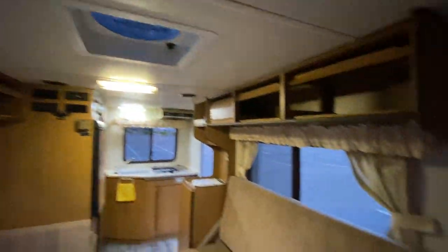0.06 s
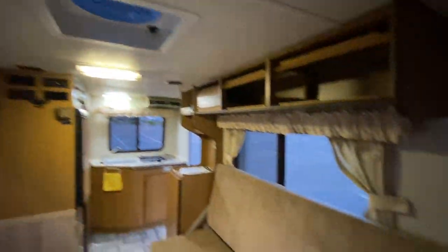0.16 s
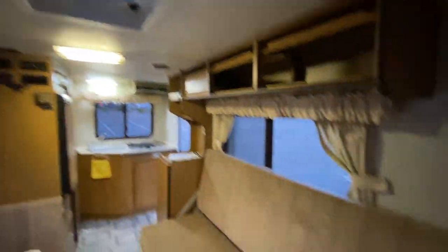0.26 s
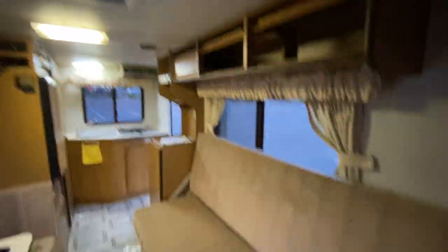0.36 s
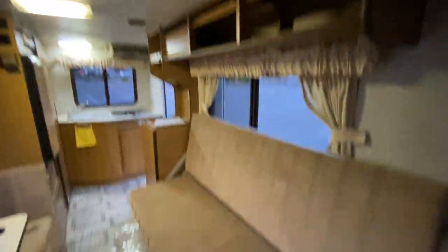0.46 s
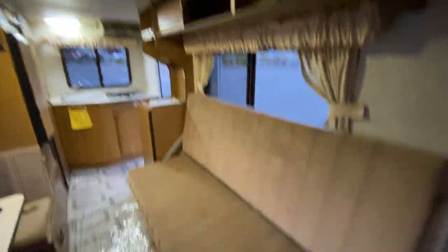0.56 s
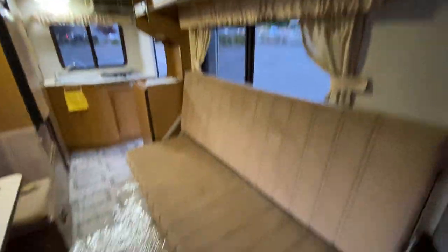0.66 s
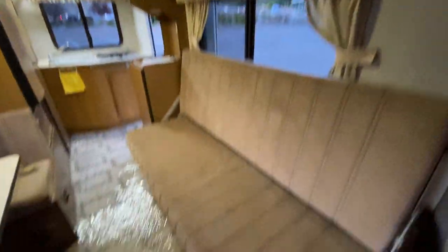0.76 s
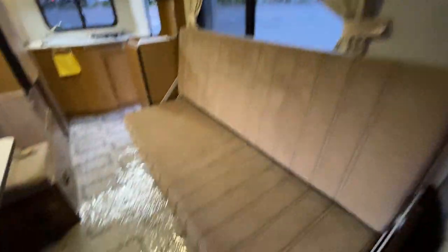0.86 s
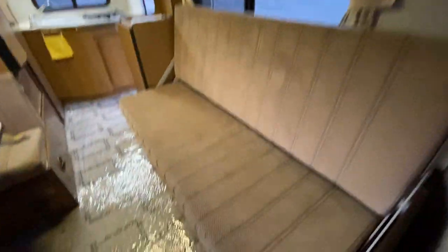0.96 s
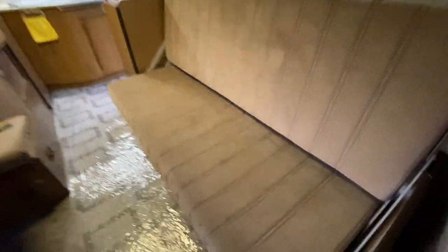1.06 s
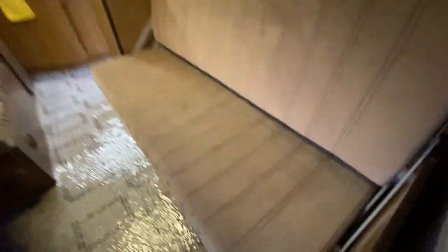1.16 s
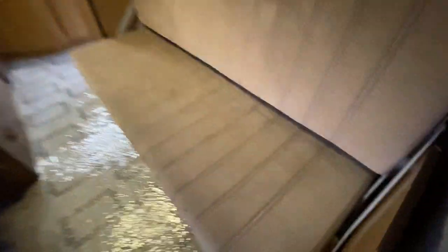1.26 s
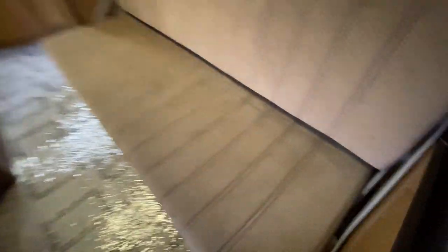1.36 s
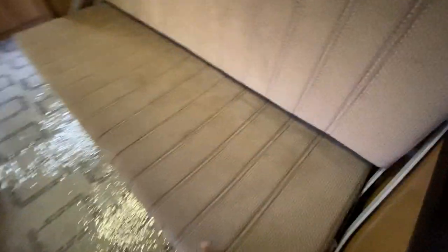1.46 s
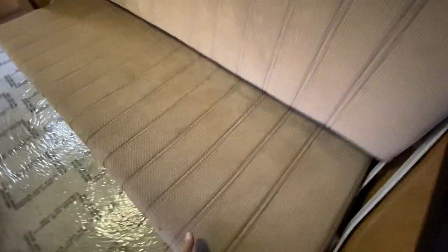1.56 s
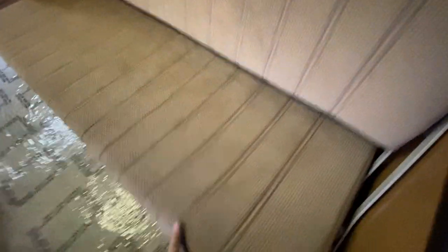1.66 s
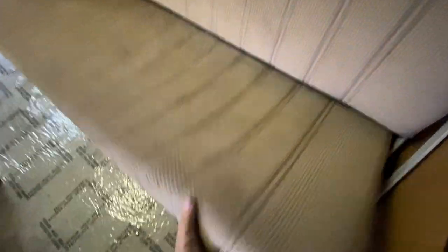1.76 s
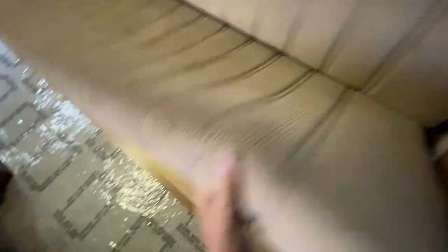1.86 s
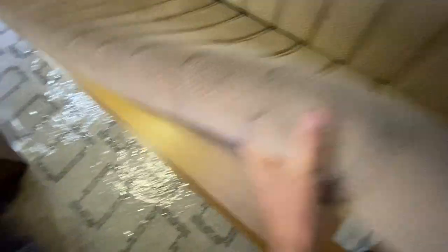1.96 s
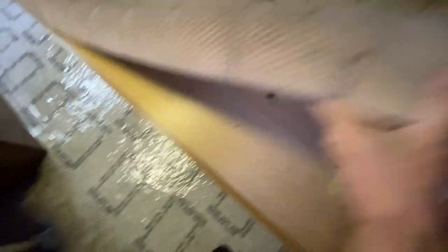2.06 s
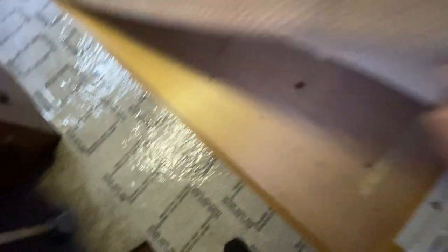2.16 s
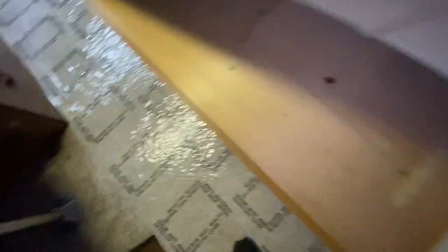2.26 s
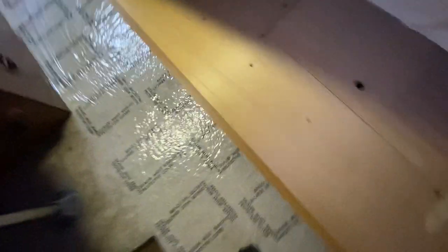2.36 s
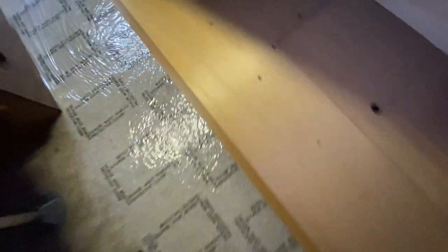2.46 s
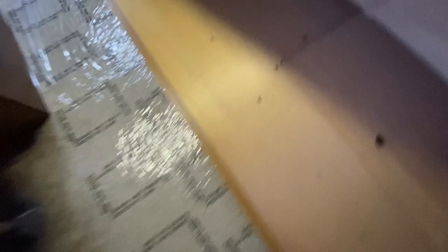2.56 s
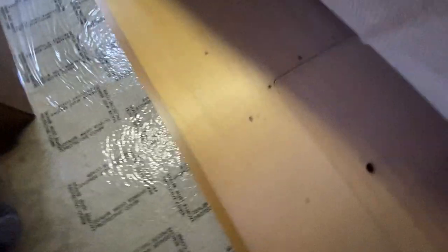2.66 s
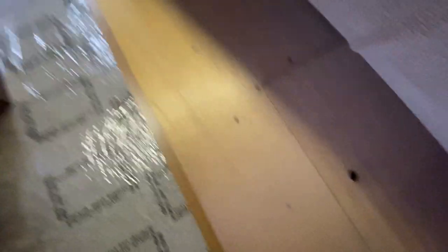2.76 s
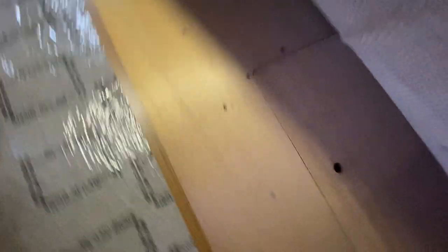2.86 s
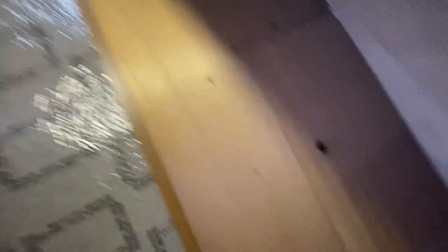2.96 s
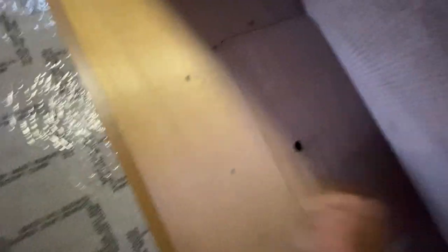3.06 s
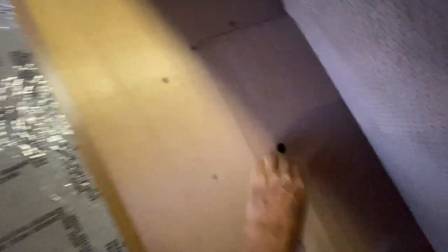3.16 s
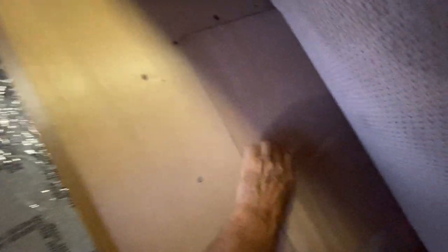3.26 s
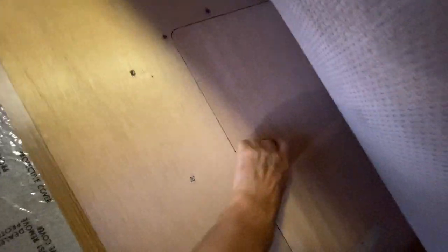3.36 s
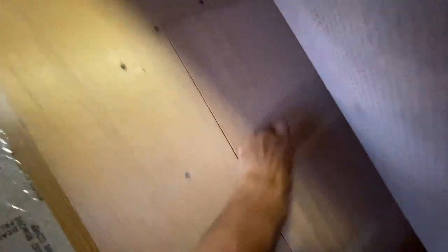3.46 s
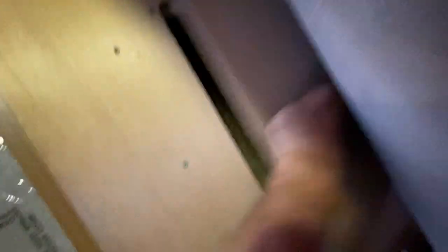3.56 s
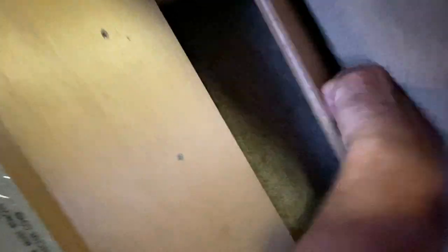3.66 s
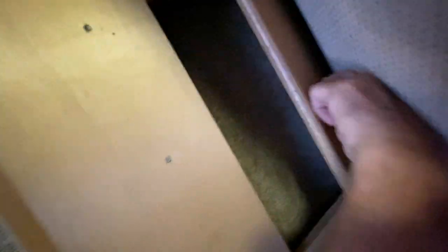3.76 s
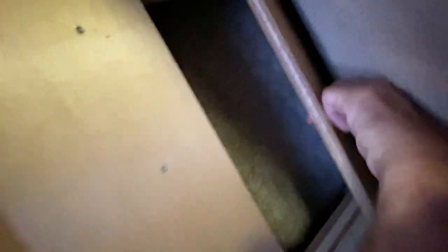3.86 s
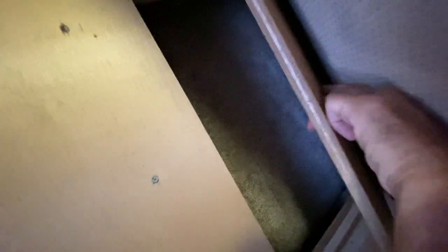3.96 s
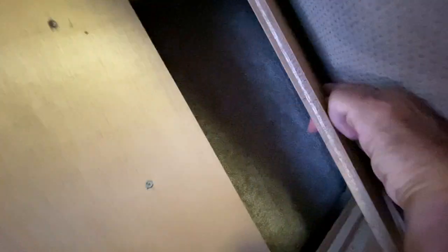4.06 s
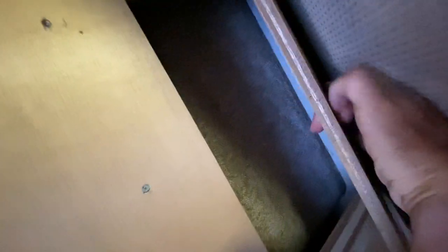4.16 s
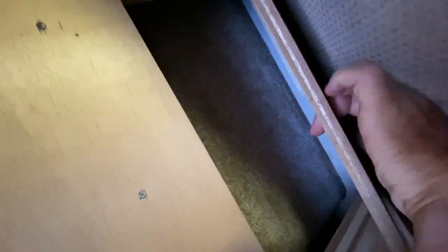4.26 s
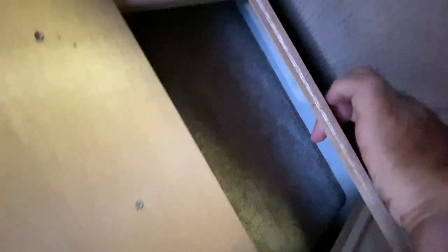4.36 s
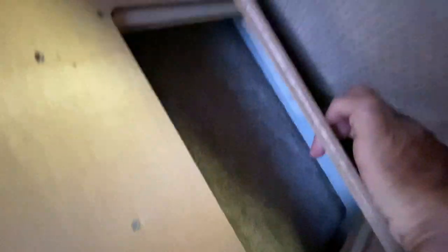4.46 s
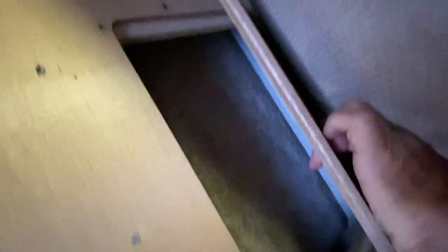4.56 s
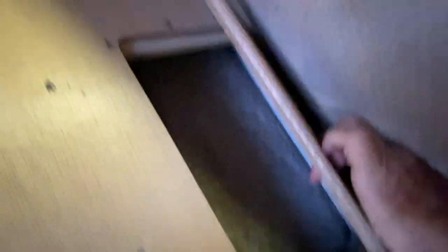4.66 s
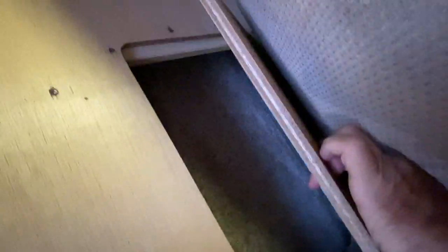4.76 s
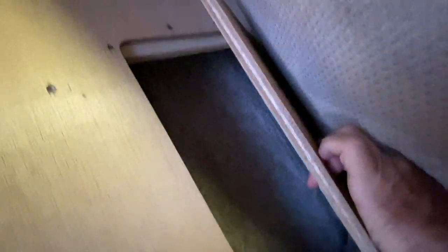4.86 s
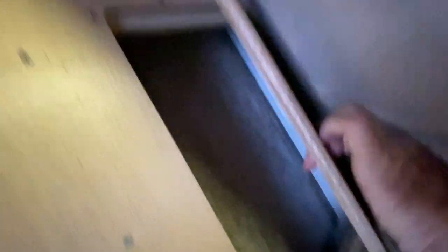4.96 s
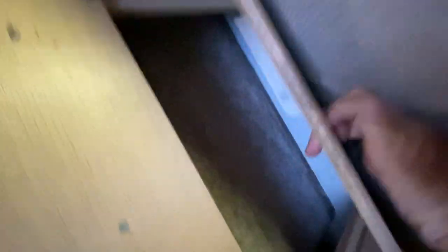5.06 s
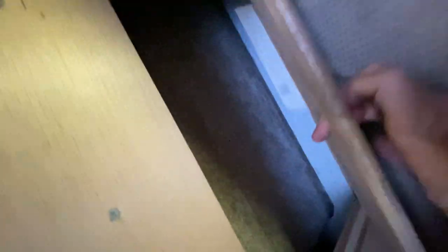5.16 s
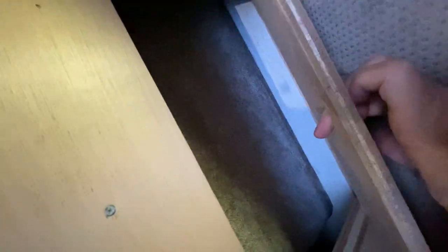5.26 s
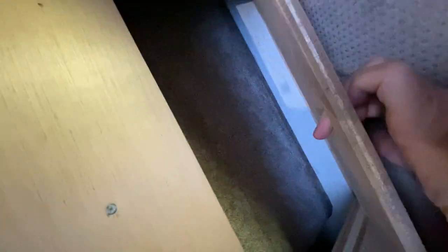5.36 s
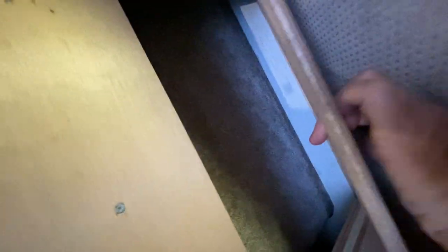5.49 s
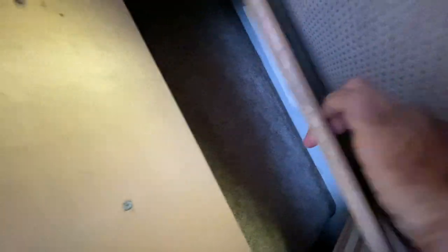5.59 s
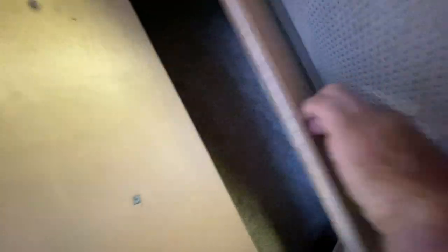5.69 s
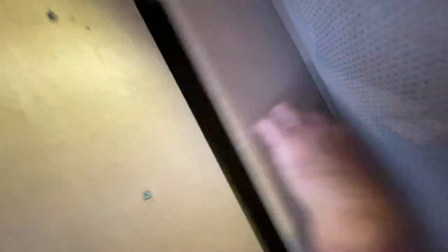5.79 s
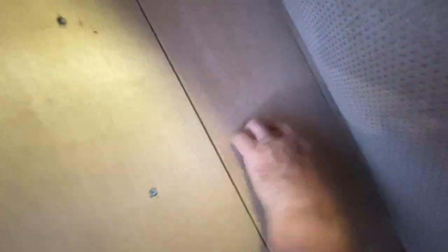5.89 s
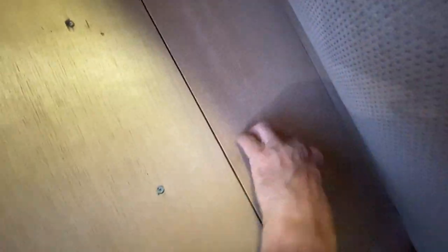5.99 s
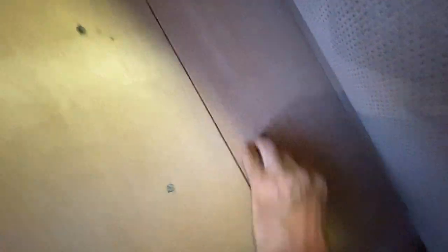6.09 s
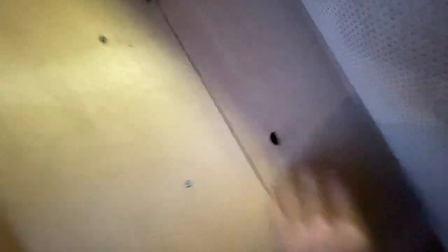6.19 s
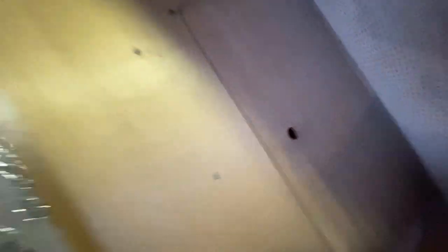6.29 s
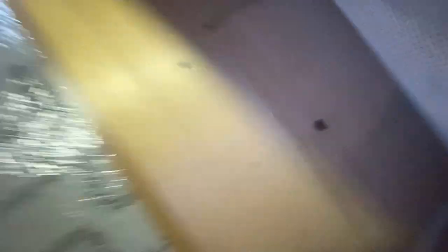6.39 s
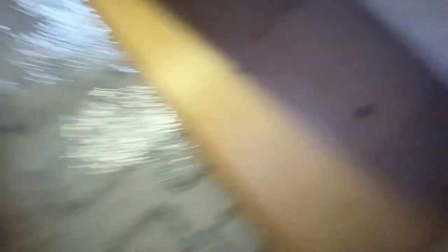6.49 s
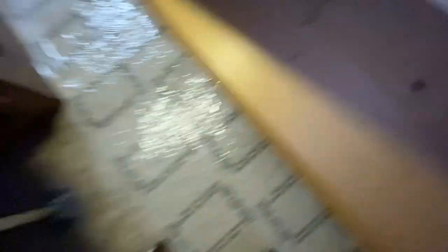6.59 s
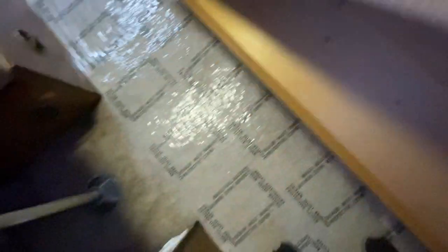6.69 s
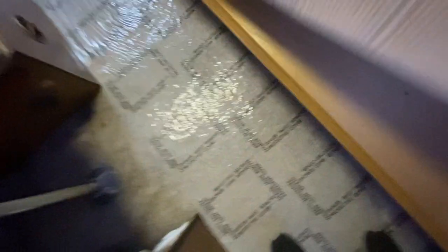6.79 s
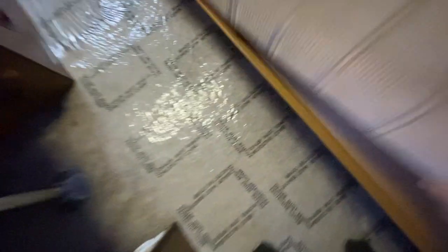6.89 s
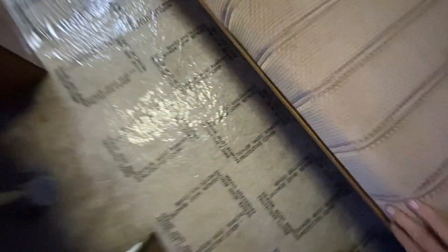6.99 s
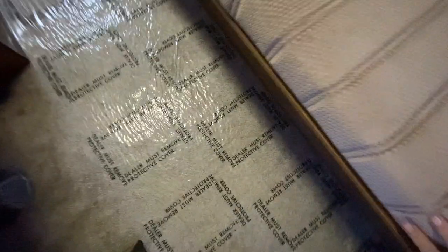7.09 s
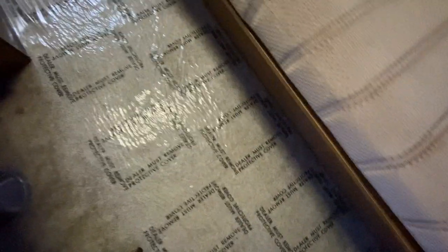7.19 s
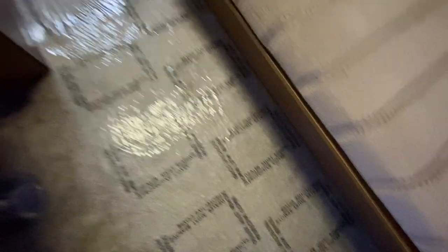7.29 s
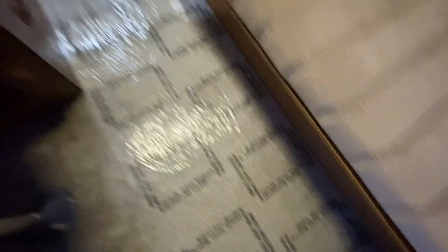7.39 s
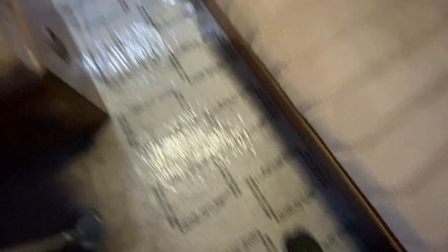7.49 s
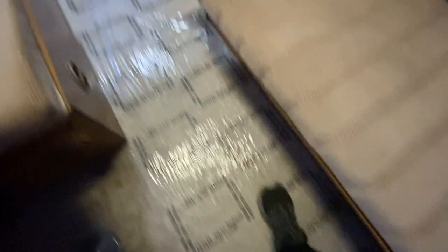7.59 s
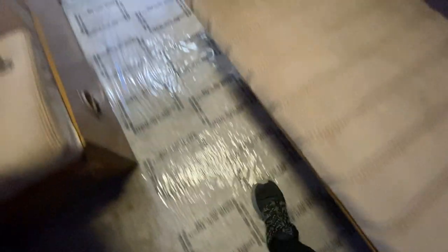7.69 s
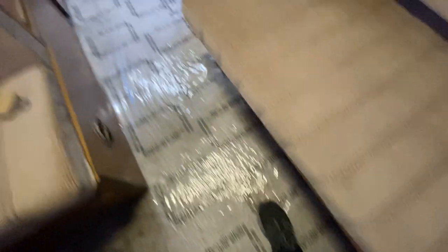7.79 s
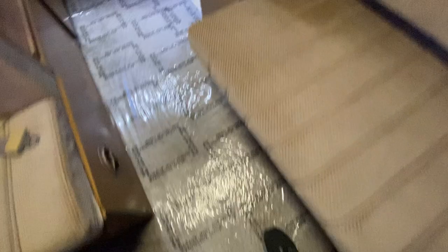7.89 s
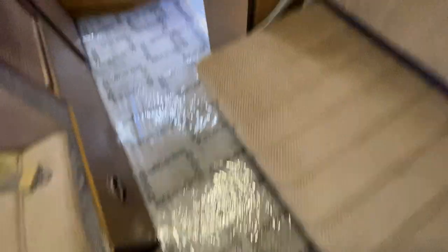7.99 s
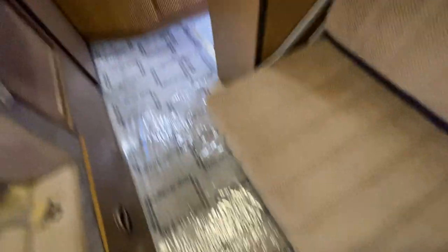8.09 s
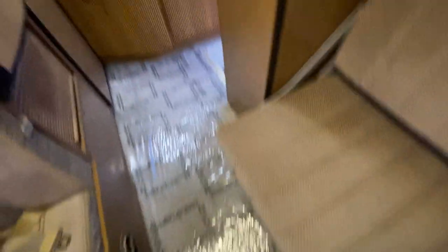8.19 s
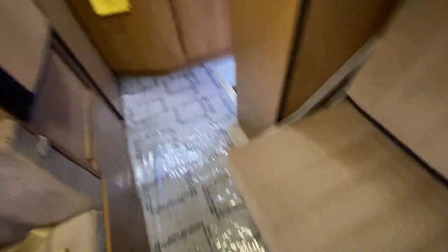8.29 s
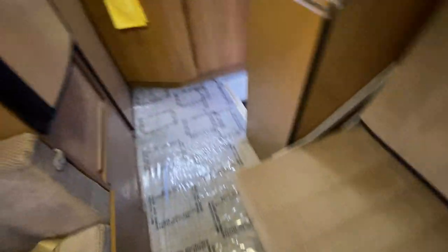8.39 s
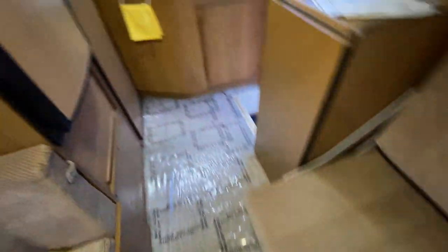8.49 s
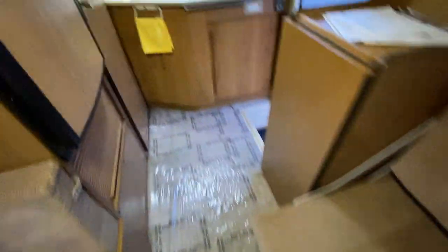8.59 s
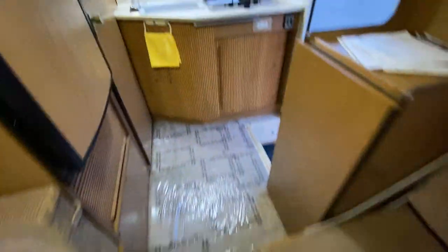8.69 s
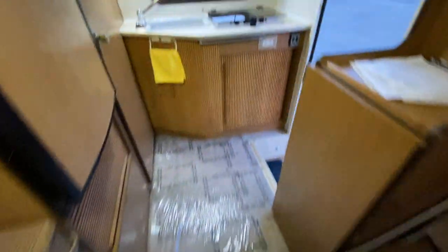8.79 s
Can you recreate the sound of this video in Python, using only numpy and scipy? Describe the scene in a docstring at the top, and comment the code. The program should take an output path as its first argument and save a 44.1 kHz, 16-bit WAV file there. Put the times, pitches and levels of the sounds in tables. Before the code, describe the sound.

Inside a small camper, heard up close, clothes rustle over a low, still room tone, and footsteps thud on the hollow floor at about 1 second. From 1.6 to 2.5 seconds a sofa cushion is lifted, its ribbed fabric rasping in several strokes with a padded thump. Sleeves swish, and between 3.1 and 3.8 seconds fingers wipe, bump and scrape a plywood hatch, which knocks twice. From 4 to 5.3 seconds the raised lid creaks quietly against the padded backrest, with small clicks. It knocks at 5.7 seconds and slams shut at 5.9 with a brief wooden rattle, the loudest sound. A hand brushes the wood, and the cushion flops back near 6.9 seconds. Shoes turn softly on the floor, and from 7.4 seconds to nearly 9 more steps boom dully, with rustling clothes, light clicks and a faint hollow hum.

```python
"""In a small camper, clothes rustle over still air and steps shake the hollow floor.
A sofa cushion is lifted, its ribbed cover rasping as the fibres catch and let go.
Fingers wipe and bump the plywood hatch under it; the lid knocks and, raised, creaks along the backrest.
Let go, it slams and rattles, ringing the modes of the panel and its box.
The cushion flops back, soles turn and more steps set the shell booming over a faint hollow hum."""
import sys
import numpy as np
from scipy import signal
from scipy.fft import rfft, irfft, next_fast_len
from scipy.io import wavfile

SR = 44100
rng = np.random.default_rng(int(sys.argv[2]) if len(sys.argv) > 2 else 0)


def transcribe(u):
    """Save the signal u as a 16-bit wav file named by the first command-line argument.

    u: samples, shape (n,) or (channels, n), limited to [-1, 1]; the rate is SR.
    q: integer samples, one column per channel.
    """
    v = np.clip(np.atleast_2d(u).T, -1, 1)
    q = np.round(v * 32767).astype(np.int16)
    wavfile.write(sys.argv[1], SR, q)


N = 389844


def amp(db):
    """Decibels to gain."""
    return 10 ** (np.asarray(db) / 20)


def unit(x):
    """Scales to rms 1."""
    return x / np.sqrt(np.mean(x ** 2) + 1e-20)


def read(points, hz):
    """Reads a curve along a logarithmic frequency axis."""
    points_hz, values = np.transpose(points)
    return np.interp(np.log(hz + 1), np.log(points_hz + 1), values)


def pan(db):
    """Left and right gains; positive leans left."""
    return amp([[db / 2], [-db / 2]])


def add(mix, start_s, sound):
    """Lays a stereo sound into the mix."""
    part = mix[:, round(start_s * SR):][:, :sound.shape[1]]
    part += sound[:, :part.shape[1]]


def pair(x, correlation):
    """Narrows two unrelated signals into a partly alike stereo pair."""
    return np.array([x[0], correlation * x[0] + np.sqrt(1 - correlation ** 2) * x[1]])


def filtered(x, hz, kind, order=2):
    """A causal low-pass or high-pass."""
    return signal.sosfilt(signal.butter(order, hz, kind, fs=SR, output="sos"), x)


def wobble(per_s):
    """A smooth random drift of rms 1."""
    position = np.arange(N) * per_s / SR
    count = int(position[-1]) + 2
    return unit(np.interp(position, np.arange(count), rng.standard_normal(count)))


def resonate(x, hz, width_hz):
    """A resonance of gain 1 whose centre follows the curve hz."""
    carrier = np.exp(2j * np.pi * np.cumsum(hz) / SR)
    pole = np.exp(-np.pi * width_hz / SR)
    return 2 * (carrier * signal.lfilter([1 - pole], [1, -pole], x / carrier + 1e-18)).real


def friction(slips_per_s, spread_db, slip_s, smooth):
    """Fibres catch and let go: short bursts of uneven size over a smooth hiss."""
    slipping = rng.random(N) < slips_per_s / SR
    slips = slipping * amp(spread_db * np.minimum(rng.exponential(1, N), 4))
    power = signal.lfilter([1], [1, -np.exp(-1 / (slip_s * SR))], slips ** 2)
    return np.sqrt(power / power.mean() + smooth) * rng.standard_normal((2, N))


def sweeps(moves, rise_share=0.43, depth_db=17.5, bend=1.2):
    """Envelope of overlapping swells, each rising to its peak and fading more slowly."""
    t, power = np.arange(N) / SR, np.zeros(N)
    for peak_s, length_s, db in moves:
        near = slice(*np.searchsorted(t, [peak_s - length_s, peak_s + 2 * length_s]))
        offset = (t[near] - peak_s) / length_s
        away = np.maximum(-offset / rise_share, offset / (1 - rise_share))
        power[near] += amp(db - depth_db * away ** bend) ** 2
    return np.sqrt(power)


def stroke(start_s, rise_s, hold_s, fall_s):
    """Speed of a sliding movement: it gathers, holds and dies away."""
    t = np.arange(N) / SR - start_s
    return np.clip(t / rise_s, 0, 1) ** 2 * np.exp(-np.clip((t - rise_s - hold_s) / fall_s, 0, 20))


# stereo image of the cabin: freq_hz, correlation
STEREO_IMAGE = [(30, 0.94), (250, 0.71), (500, 0), (900, 0), (16000, 0.12)]
def colour(x, spectrum):
    """Gives a stereo excitation its tone at rms 1; long waves reach both sides alike."""
    size = next_fast_len(N)
    hz = np.fft.rfftfreq(size, 1 / SR)
    stereo = pair(rfft(x, size), read(STEREO_IMAGE, hz))
    return unit(irfft(stereo * amp(read(spectrum, hz)), size)[:, :N])


# room tone of the still air: freq_hz, level_db
AIR_TONE = [(20, -24), (58, 5), (100, -4), (180, -5.5), (300, -16.5), (450, -17), (800, -17), (1250, -22),
            (1900, -31), (3000, -46.5), (6000, -47.5), (10000, -51), (16000, -68)]
# low boom of the camper's shell: freq_hz, level_db
SHELL_TONE = [(20, -22), (45, -1.5), (68, 5.5), (100, -6.5), (170, -21.5), (300, -18), (700, -34),
              (2000, -37.5), (8000, -110)]
def cabin(activity, air_db=-49.5, rest_db=-61.5, stirred_db=-43, settle_s=0.23, growth=0.23):
    """Still air, and the boom of the shell, which swells with the activity inside and settles slowly."""
    air = amp(air_db) * colour(rng.standard_normal((2, N)), AIR_TONE)
    stir = signal.lfilter([1], [1, -np.exp(-1 / (settle_s * SR))], (activity ** 2).mean(0))
    boom = amp(rest_db) + amp(stirred_db) * (stir / stir.max()) ** growth
    return air + boom * colour(rng.standard_normal((2, N)), SHELL_TONE)


# one swish for each reach or stride: peak_s, length_s, level_db
CLOTH_SWISHES = [(0.48, 0.61, -68.5), (1.15, 1, -65.5), (1.41, 0.49, -61.5), (1.65, 0.34, -56.5),
                 (2.48, 0.56, -56), (2.89, 0.68, -55.5), (3.25, 0.58, -57), (3.5, 0.12, -47.5),
                 (3.61, 0.95, -60), (4.11, 0.37, -67.5), (6.46, 0.71, -60.5), (6.67, 0.35, -57),
                 (6.92, 0.71, -58), (7.37, 0.7, -61.5), (7.79, 1, -59.5), (8.55, 0.92, -63),
                 (8.75, 0.55, -62)]
# soft rustle of clothing: freq_hz, level_db
CLOTH_TONE = [(290, -29), (550, -4.5), (900, -1.5), (1500, -6.5), (2300, -6), (3900, -9.5), (7000, -11),
              (10500, -14.5), (12500, -18.5), (16000, -28.5)]
def clothes(gain_db=6):
    """Sleeves and trousers swish as cloth brushes cloth."""
    grain = friction(slips_per_s=250, spread_db=1.6, slip_s=0.0048, smooth=0.62)
    return amp(gain_db) * colour(grain, CLOTH_TONE) * sweeps(CLOTH_SWISHES)


# crowded modes of panels and close walls: centre_hz, level_db, t60_s, correlation
CLATTER_BANDS = [(70, -19, 0.84, 0.95), (140, -10.5, 0.32, 0.77), (281, -15.5, 0.16, 0.78),
                 (550, -16, 0.18, 0.002), (1050, -12.5, 0.11, 0), (2200, -17, 0.12, 0.3),
                 (4650, -18, 0.086, 0.063), (8000, -22.5, 0.07, 0.51), (15740, -32, 0.06, 0.089)]
def clatter(t, crack_db=4, crack_s=0.0019):
    """Dense ringing after a contact: a short crack, then each band dies at its own speed."""
    hz, out = np.fft.rfftfreq(len(t), 1 / SR), 0
    noise = rfft(rng.standard_normal((2, len(t))))
    crack = 1 + amp(crack_db) * np.exp(-t / crack_s)
    for centre_hz, db, t60_s, correlation in CLATTER_BANDS:
        share = read([(row[0], row[0] == centre_hz) for row in CLATTER_BANDS], hz)
        envelope = amp(-60 * t / t60_s) * (1 - np.exp(-2 * t * centre_hz)) * crack
        band = irfft(pair(noise, correlation) * np.sqrt(share) * hz / (hz + 40)) * envelope
        out = out + amp(db) * unit(band) * np.sqrt(np.mean(envelope ** 2))
    return out


def tick(db, brightness_hz, low_cut_hz=600, decay_s=0.03):
    """A sharp edge contact, too short to move the low modes."""
    t = np.arange(2 ** 13) / SR
    crack = clatter(t, crack_db=10, crack_s=0.0015) * np.exp(-t / decay_s)
    return amp(db) * filtered(filtered(crack, low_cut_hz, "high"), brightness_hz, "low")


# small hard contacts: start_s, level_db, brightness_hz
TICK_HITS = [(0.473, -43.5, 1500), (.934, -31.5, 6800), (0.95, -54, 12000), (1.213, -45, 2520),
             (3.526, -31, 3000), (3.649, -37.5, 3800), (3.703, -42, 3194), (4.163, -49.5, 5000),
             (4.228, -46, 2000), (4.731, -45.5, 2410), (4.812, -44.5, 2380), (4.864, -53, 1680),
             (4.914, -54, 1700), (4.93, -43.5, 2500), (4.97, -45, 2200), (5.117, -41, 6040),
             (5.239, -50, 2200), (5.31, -42, 2500), (5.888, -13, 5160), (5.8955, -24.5, 10910),
             (5.902, -20, 6480), (6.913, -33, 650), (7.365, -43.5, 2200), (7.643, -41, 1090),
             (7.683, -37, 900), (7.717, -34, 2370), (8.533, -40, 2500), (8.613, -49, 4000),
             (8.716, -36, 2600)]
def ticks():
    """The lid's rim, the fittings and the floor click, loudest at the slam."""
    out = np.zeros((2, N))
    for start_s, db, brightness_hz in TICK_HITS:
        add(out, start_s, tick(db, brightness_hz))
    return out


# footfalls: start_s, level_db, pitch_hz, swell_s, scuff_db
FOOTFALLS = [(0.877, -39.5, 103.7, 0.0098, 6), (0.953, -25, 46.8, 0.019, -10.5),
             (1.068, -39.5, 47, 0.042, -31), (1.211, -48, 99, 0.015, 11.5), (7.431, -40, 70, 0.038, -12),
             (7.706, -28.5, 70, 0.025, -15), (8.379, -36.5, 58, 0.028, -39), (8.721, -40, 70, 0.011, -0.5)]
def steps(scuff_hz=600):
    """The hollow floor swings under each foot while the heel scuffs it."""
    t, out = np.arange(2 ** 15) / SR, np.zeros((2, N))
    for start_s, db, pitch_hz, swell_s, scuff_db in FOOTFALLS:
        boom = t / swell_s * np.exp(1 - t / swell_s) * np.sin(2 * np.pi * pitch_hz * t)
        scuff = amp(scuff_db) * filtered(clatter(t), scuff_hz, "low")
        add(out, start_s, amp(db) * (boom + scuff))
    return out


# hand and cushion dragging over upholstery: start_s, rise_s, hold_s, fall_s, level_db, body_db, seam_db
CUSHION_STROKES = [(0.901, 0.035, 0.014, 0.019, -48, 8.5, -2.5),
                   (1.626, 0.095, 0.0071, 0.011, -38.5, 6.5, 6),
                   (1.687, 0.027, 0.066, 0.012, -23, 0.5, -15.5),
                   (1.787, 0.018, 0.28, 0.084, -53.5, 8.5, 0.5),
                   (1.927, 0.054, 0.026, 0.021, -35.5, -3.5, -7),
                   (1.993, 0.045, 0.018, 0.0077, -31, -5.5, -5), (2.08, .01, 0.0046, 0.016, -50.5, -15, -3),
                   (2.131, 0.013, 0.029, 0.023, -37, 2.5, 4), (2.185, 0.01, 0.014, 0.023, -42.5, 2, -31),
                   (2.253, 0.0044, 0.009, 0.046, -39.5, 5.5, -0.5),
                   (2.262, 0.087, 0.034, 0.014, -30.5, -1.5, -4.5),
                   (2.392, 0.011, 0.12, 0.099, -66.5, 21, 11), (6.921, 0.028, .045, 0.018, -54, 9.5, 1)]
# bright rasp of the cover: freq_hz, level_db
COVER_TONE = [(150, -33), (500, -10), (1000, -8.5), (1500, -16), (2200, -9), (3400, -12), (5000, -5.5),
              (6500, -5.5), (8000, -8), (10000, -12), (12000, -13.5), (16000, -25)]
# singing peaks of the cover's ribs: freq_hz, level_db
RIB_TONE = [(1000, -26.5), (1330, -13.5), (1470, 5), (1620, -13.5), (3800, -18), (5300, -3), (5900, -9.5),
            (6500, 4.5), (7600, -9.5), (11000, -14.5), (16000, -31.5)]
# hollow body of the cushion: freq_hz, level_db
CUSHION_TONE = [(40, -14), (90, -6.5), (160, -3), (300, -5), (420, -4.5), (540, -8.5), (800, -14),
                (1450, -17), (2000, -28), (5000, -92.5)]
def upholstery(cover_pan_db=1.5, body_pan_db=-1, song_db=-1):
    """Ribbed fabric rasps, and sings under the hardest strokes; the cushion adds a coarser rumble."""
    rasp, body = 0, 0
    for *timing, db, body_db, _ in CUSHION_STROKES:
        speed = stroke(*timing)
        rasp = rasp + amp(db) * speed
        body = body + amp(db + body_db) * speed
    weave = friction(slips_per_s=420, spread_db=2.4, slip_s=0.0011, smooth=0.35)
    ribs = friction(slips_per_s=170, spread_db=2.5, slip_s=0.0023, smooth=0.23)
    song = amp(song_db) * rasp / rasp.max() * colour(rng.standard_normal((2, N)), RIB_TONE)
    catches = amp(1.1 * wobble(110))
    cover = pan(cover_pan_db) * rasp * (colour(weave, COVER_TONE) + song)
    rumble = pan(body_pan_db) * body * colour(ribs, CUSHION_TONE)
    return catches * (cover + rumble)


# coarse scratch of a seam: freq_hz, level_db
SEAM_TONE = [(300, -18.5), (700, -7), (1000, 3.5), (1350, -4), (2000, -2), (4000, -6), (7000, -18),
             (16000, -39)]
def seams(rasp_hz=1650, width_hz=220):
    """On the same strokes the seams snag thread by thread: grit with a wandering, rasping note."""
    pressure = sum(amp(db + seam_db) * stroke(*timing) for *timing, db, _, seam_db in CUSHION_STROKES)
    grit = colour(friction(slips_per_s=480, spread_db=2.2, slip_s=0.0005, smooth=0.08), SEAM_TONE)
    pitch_hz = rasp_hz * amp(1.1 * wobble(22))
    return pressure * unit(grit + resonate(grit, pitch_hz, width_hz))


# short whistles of ribbed cloth; the last row is a faint hollow hum near 900 Hz during the footsteps:
# peak_s, length_s, level_db, pitch_hz, width_hz
WHISTLES_AND_HUM = [(1.146, 0.53, -66.5, 4380, 700), (1.395, 0.17, -54, 1820, 600),
                    (2.876, 0.33, -52, 454, 249), (2.88, 0.19, -51.5, 2330, 1110),
                    (3.292, 0.74, -55.5, 9300, 2030), (3.32, 0.17, -48, 523, 90),
                    (6.857, 0.23, -62, 6800, 900), (6.96, 0.11, -61, 6100, 6000),
                    (7.345, 0.038, -50.5, 8500, 5000), (8.1, 3.8, -61.5, 904, 200)]
def whistles_and_hum(pan_db=-2.5, pitch_sag=0.2):
    """Fuzzy noise bands rise and fall in pitch: brief whistles of cloth ribs, and one long faint hum."""
    out = np.zeros((2, N))
    grain = friction(slips_per_s=430, spread_db=5.5, slip_s=0.0043, smooth=0.5)
    for peak_s, length_s, db, pitch_hz, width_hz in WHISTLES_AND_HUM:
        t = np.arange(N) / SR - peak_s
        near = abs(t) < length_s
        glide_hz = pitch_hz * np.exp(-pitch_sag * (2 * t[near] / length_s) ** 2)
        carrier = np.exp(2j * np.pi * np.cumsum(glide_hz) / SR)
        # a band-pass that rides the glide
        band = (carrier * filtered(grain[:, near] / carrier, width_hz / 2, "low")).real
        out[:, near] += unit(band) * sweeps([(peak_s, length_s, db)])[near]
    return pan(pan_db) * out


# modes of the lid and its box: pitch_hz, level_db, t60_s, pan_db
WOOD_MODES = [(71.75, -10, 0.29, -4), (111.1, -5, 0.15, 1), (140, -18.5, 0.68, -2.5),
              (217.5, -5, 0.091, -5), (283.2, -12, 0.15, -0.5), (312, -16, 0.2, -0.5),
              (387, -13.5, 0.093, 19.5), (476, -25.5, 0.12, 2), (583, -21.5, 0.11, -1.5),
              (716.4, -9, 0.14, 11), (770, -17.5, 0.17, 6.5), (810, -9, 0.052, -1), (1006, -8.5, 0.12, -1),
              (1240, -26.5, 0.11, 18.5), (1222, -10, 0.097, -8), (1236, -10, 0.046, -1.5),
              (1462, -10.5, 0.08, 8.5), (1840, -17.5, 0.065, 4.5), (2136, -8.5, 0.077, -6.5),
              (3170, -18.5, 0.056, 6), (3350, -23.5, 0.045, 20.5), (4700, -10.5, 0.082, 3)]
def wood_ring(t, spot_db=1.5, right_lag_s=0.00033):
    """The plywood's modes, stirred a little differently at each spot and reaching the right later."""
    age, out = np.maximum(t - np.array([[0], [right_lag_s]]), 0), 0
    for k, (pitch_hz, db, t60_s, pan_db) in enumerate(WOOD_MODES):
        swing = np.sin(2 * np.pi * pitch_hz * age) * (1 - np.exp(-2 * age * pitch_hz))
        decay = amp(db + spot_db * rng.standard_normal() - 60 * age / t60_s)
        out = out + (-1) ** k * pan(pan_db) * decay * swing
    return out


def wood_hit(db, hardness_hz, bass_db, ring_db=-1, clatter_db=-1, shelf_hz=190):
    """One contact with the plywood: a soft one stirs only the low modes, a hard one stirs them all."""
    t = np.arange(2 ** 15) / SR
    wood = amp(ring_db) * wood_ring(t) + amp(clatter_db) * clatter(t)
    wood = wood + (amp(bass_db) - 1) * filtered(wood, shelf_hz, "low", order=1)
    return amp(db) * filtered(wood, hardness_hz, "low", order=4)


# padded thumps: start_s, level_db, hardness_hz, bass_db, pan_db
SOFT_BUMPS = [(1.783, -14, 265, -4.5, -1.5), (3.165, -16.5, 140, 1.5, -2.5), (3.198, -21.5, 276, -20, 1.5),
              (3.48, -23, 430, 2, -4), (3.502, -29, 375, 14, -1), (3.563, -14, 335, -6, -2.5),
              (3.621, -36, 1590, -10, -9), (3.644, -27, 530, 7, -5), (3.777, -14, 264, 1, 2.5),
              (5.117, -38.5, 611, 11, -5.5), (5.64, -21, 298, -11.5, 0), (6.495, -28.5, 326, -22, -7),
              (6.914, -25.5, 580, 5, -4.5), (7.008, -30.5, 317, 2.5, -3.5), (7.727, -33.5, 800, -12, -4)]
def bumps():
    """Fingers, foot and cushion meet the lid and its box softly."""
    out = np.zeros((2, N))
    for start_s, db, hardness_hz, bass_db, pan_db in SOFT_BUMPS:
        add(out, start_s, pan(pan_db) * wood_hit(db, hardness_hz, bass_db))
    return out


# the hand wiping the face of the lid: start_s, rise_s, hold_s, fall_s, level_db
PALM_WIPES = [(3.142, 0.025, 0.25, .03, -55.5), (5.448, 0.084, 0.2, 0.081, -62),
              (5.585, 0.063, 0.011, 0.0087, -49), (5.7, 0.11, 0.062, 0.024, -56.5),
              (5.94, 0.025, 0.11, 0.032, -59.5), (6.045, 0.098, 0.049, 0.013, -47)]
# whisper of skin on wood: freq_hz, level_db
SKIN_TONE = [(300, -8.5), (800, -9), (1200, 2.5), (1700, -6), (2200, 2), (3200, -4), (5000, -7),
             (8500, -11), (12000, -12), (16000, -24)]
def palm():
    """Dry skin slides over the plywood with a fine grain."""
    speed = sum(amp(db) * stroke(*timing) for *timing, db in PALM_WIPES)
    grain = friction(slips_per_s=540, spread_db=2, slip_s=0.003, smooth=0.65)
    return speed * colour(grain, SKIN_TONE)


# hollow resonances of the rubbed lid: pitch_hz, width_hz, level_db
LID_RESONANCES = [(520, 70, 7), (800, 50, -1), (1246, 60, 6.5), (2170, 120, 4.5), (3110, 130, 0.5),
                  (4000, 140, -8), (4490, 200, -2.5), (5050, 270, -1.5), (6340, 270, -6.5),
                  (8360, 450, -8.5)]
def rubbed_lid(rub, direct_db=-7.5):
    """A rub sounds through the lid's resonances, which drift, swell and sink as the contact moves."""
    rings = 0
    for pitch_hz, width_hz, db in LID_RESONANCES:
        swell = amp(2.5 * wobble(14))
        drift = amp(0.33 * wobble(9))  # about 4 % rms in pitch
        rings = rings + amp(db) * swell * resonate(rub, pitch_hz * drift, width_hz)
    return amp(direct_db) * rub + rings


# fingers and rim sliding on plywood: start_s, rise_s, hold_s, fall_s, level_db
LID_SCRAPES = [(3.465, 0.018, 0.065, 0.094, -44.5), (3.551, 0.056, 0.15, 0.038, -49.5),
               (3.7, 0.015, 0.022, 0.0035, -46), (5.87, 0.019, 0.013, 0.0062, -18.5)]
# dry, hollow scrape of plywood: freq_hz, level_db
PLYWOOD_TONE = [(100, -14), (300, 8), (550, 13), (850, 0), (1300, 9), (1750, -2.5), (2250, 4.5), (4500, -3),
                (7000, -28), (16000, -30)]
def scrapes(pan_db=-1):
    """Catching rubs as the lid is gripped and as it grazes its frame."""
    speed = sum(amp(db) * stroke(*timing) for *timing, db in LID_SCRAPES)
    grain = friction(slips_per_s=170, spread_db=1.8, slip_s=0.0016, smooth=0.15)
    return pan(pan_db) * speed * colour(grain, PLYWOOD_TONE)


# the lid's knocks and its slam:
# start_s, edge_db, hardness_hz, weight_lag_s, weight_db, weight_bass_db, pan_db, grip_db_per_s
LID_KNOCKS = [(3.680, -11, 460, 0.0065, -6, -1, -2, 69.5), (3.7368, -11.5, 2300, .0055, -5, -12, -1, 106),
              (5.6617, -2.5, 600, .0095, -3.5, -3, -3, 108), (5.8887, -4, 2500, 0.00597, -11, 9, -0.5, 0.5),
              (5.906, -7, 2995, .006, -16.5, -4.5, -1.5, 1.5)]
def knocks():
    """The lid's edge strikes and its weight follows with a duller thud; a gripping hand damps both."""
    t, out = np.arange(2 ** 15) / SR, np.zeros((2, N))
    for start_s, edge_db, hardness_hz, lag_s, weight_db, bass_db, pan_db, grip_db_per_s in LID_KNOCKS:
        gain = pan(pan_db) * amp(-grip_db_per_s * t)
        edge = wood_hit(edge_db, hardness_hz, bass_db=-26, ring_db=-2)  # hardly bends the panel
        thud_hz = 340 * np.sqrt(hardness_hz / 1000)
        add(out, start_s, gain * edge)
        add(out, start_s + lag_s, gain * wood_hit(weight_db, thud_hz, bass_db))
    return out


# pulls of the lid's edge along the backrest: peak_s, length_s, level_db
CREAK_PULLS = [(4.15, 0.51, -55.5), (4.46, 0.21, -54), (4.57, 0.24, -54), (4.685, 0.15, -52.5),
               (5.0, 0.2, -51), (5.08, 0.17, -55.5), (5.18, 0.29, -53.5)]
# hollow ring of each slip: pitch_hz, width_hz, level_db
CREAK_RINGS = [(290, 78, -13), (673, 130, 7), (1256, 88, 8), (1620, 160, -9), (2740, 500, -25)]
# dry hiss of the dragging edge: freq_hz, level_db
EDGE_TONE = [(200, -16), (450, -11), (680, -3), (1020, -7), (1230, 2), (1600, -3), (4500, -11),
             (8000, -21.5), (16000, -41)]
def creak(slips_per_s=105, slowing=0.65, taps_db=-3, hiss_db=-6, padding_hz=2800):
    """The raised lid sticks and slips on the padded backrest: uneven taps that slow as the pull eases."""
    pull, taps = sweeps(CREAK_PULLS), 0
    rate = slips_per_s * (pull / pull.max()) ** slowing * amp(3.5 * wobble(110))
    slips = np.diff(np.floor(np.cumsum(rate) / SR), prepend=0) * amp(rng.uniform(-4, 4, N))
    for pitch_hz, width_hz, db in CREAK_RINGS:
        spot = amp(1.5 * rng.standard_normal((2, N)))  # each slip has its own colour
        resonance = signal.iirpeak(pitch_hz, pitch_hz / width_hz, fs=SR)
        taps = taps + amp(db) * signal.lfilter(*resonance, slips * spot)
    taps = filtered(taps, padding_hz, "low", order=4)
    taps = taps / np.sqrt(np.average((taps ** 2).mean(0), weights=pull ** 2))
    hiss = colour(friction(slips_per_s=200, spread_db=1.5, slip_s=0.003, smooth=0.5), EDGE_TONE)
    return pull * (amp(taps_db) * taps + amp(hiss_db) * hiss)


def rattle(drop_s=5.888, flight_s=0.0272, restitution=0.5, hardness_hz=7500, rim_db=1.5):
    """The dropped lid bounces twice on its frame, the second hop shorter, its rim cracking each time."""
    out, landing_s = np.zeros((2, N)), drop_s
    for k, db in enumerate([-13.5, -12.5]):
        landing_s += flight_s * restitution ** k
        add(out, landing_s, wood_hit(db, hardness_hz, bass_db=-6))
        add(out, landing_s, tick(db + rim_db, hardness_hz))
    return out


# pivots of a shoe: peak_s, length_s, level_db
SOLE_TURNS = [(6.47, 0.25, -48), (6.67, 0.8, -51.5), (7.58, 1.0, -56.5), (7.735, 0.12, -44.5),
              (8.6, 1, -54)]
# soft, hollow rub of a sole: freq_hz, level_db
SOLE_TONE = [(150, -9), (420, -3), (680, -6), (900, -10.5), (1150, -10), (2500, -23), (8000, -29.5)]
def soles():
    """Shoes turn on the vinyl floor with a smooth friction."""
    grain = friction(slips_per_s=92, spread_db=-3.5, slip_s=0.0032, smooth=1.0)
    return sweeps(SOLE_TURNS) * colour(grain, SOLE_TONE)


# early reflections off walls and furniture: left_delay_s, right_delay_s, level_db
REFLECTIONS = [(.0019, .0026, -23), (.0043, .0035, -13), (.0061, .0072, -12.5), (.0094, .0083, -17),
               (0.015, .0141, -16.5), (0.018, .0169, -13.5)]
def walls(x, low_cut_hz=400):
    """Close surfaces throw the treble back within milliseconds, making it boxy."""
    treble, out = filtered(x, low_cut_hz, "high", order=1), x.copy()
    for left_s, right_s, db in REFLECTIONS:
        add(out, left_s, amp(db) * treble * [[1], [0]])
        add(out, right_s, amp(db) * treble * [[0], [1]])
    return out


def scene(rub_db=-1, tread_db=14):
    """Handling and footwork over the cabin's tone; feet shake the shell far more than hands do."""
    rubbing = upholstery() + seams() + clothes() + whistles_and_hum() + creak()
    rubbing += rubbed_lid(scrapes() + palm())
    hands = bumps() + knocks() + rattle() + walls(amp(rub_db) * rubbing + ticks())
    feet = steps() + soles()
    return hands + feet + cabin(hands + amp(tread_db) * feet)


def record(dry, cutoff_hz=15850):
    """A soft clip rounds the loudest peaks, then a steep low-pass trims the top."""
    rounded = dry / (1 + dry ** 4) ** (1 / 4)
    low_pass = signal.firwin(511, cutoff_hz, window=("kaiser", 9), fs=SR)
    return signal.oaconvolve(rounded, low_pass[None], "same")


dry = scene()
out = record(dry)
transcribe(out)
```